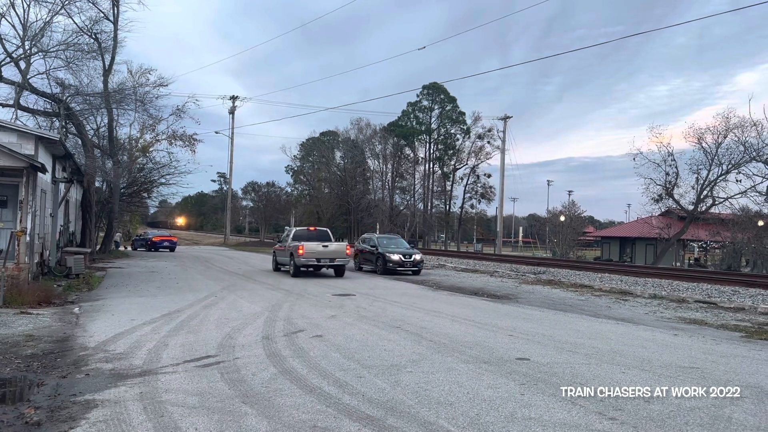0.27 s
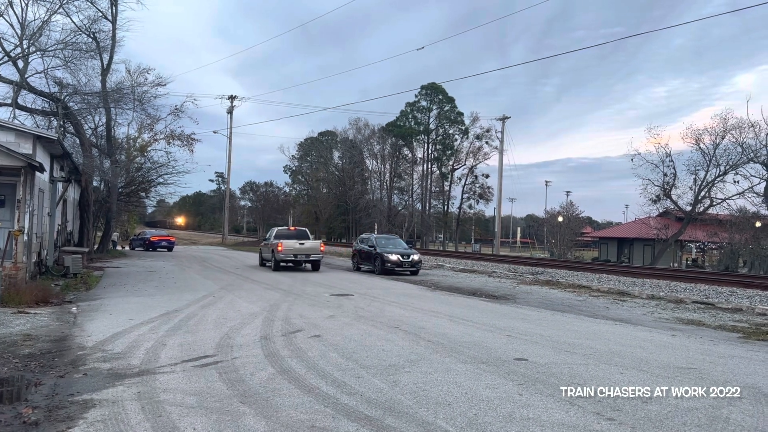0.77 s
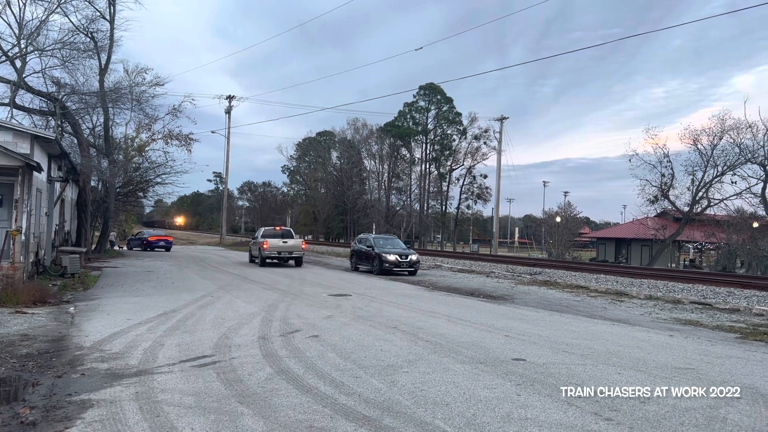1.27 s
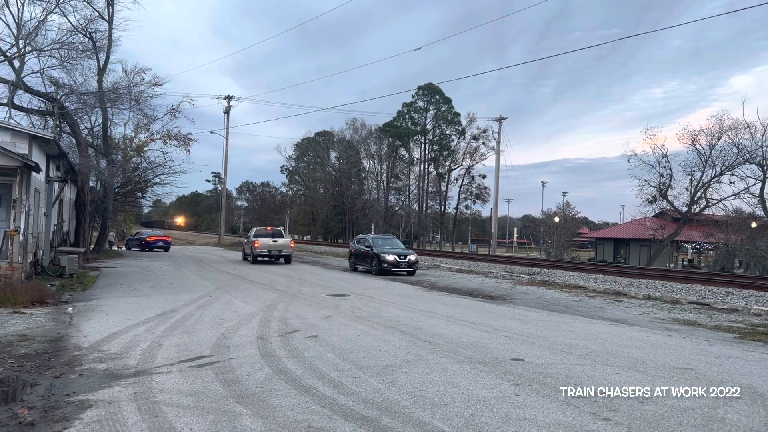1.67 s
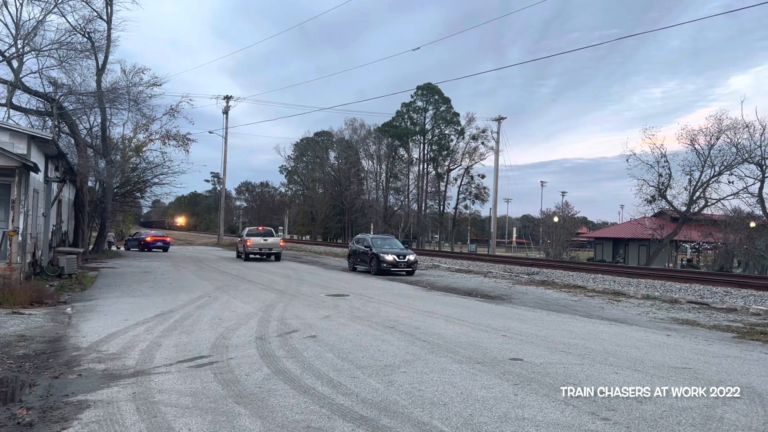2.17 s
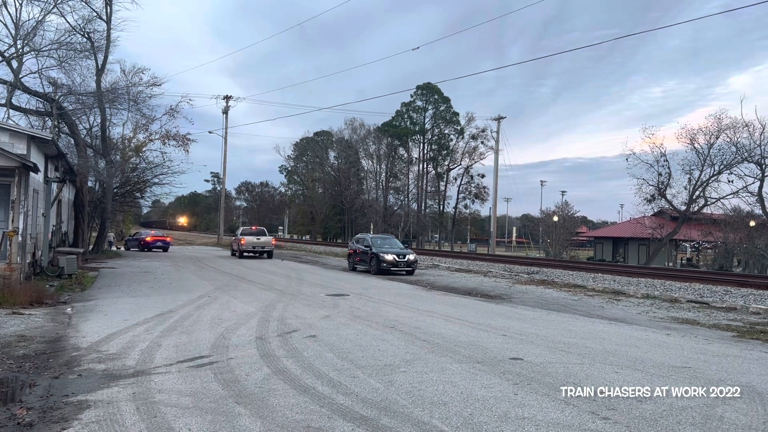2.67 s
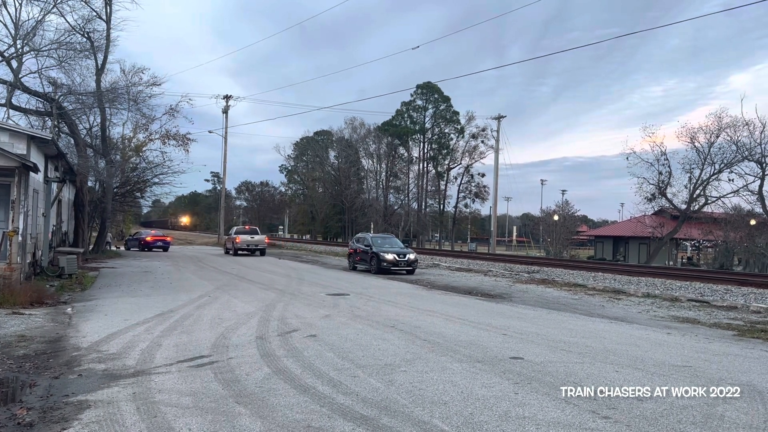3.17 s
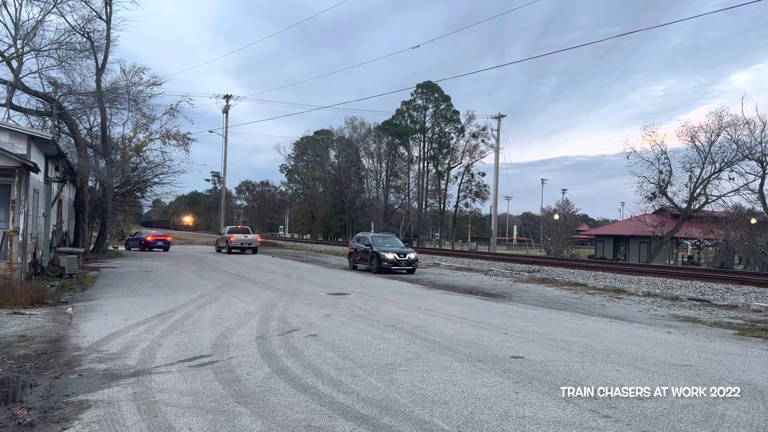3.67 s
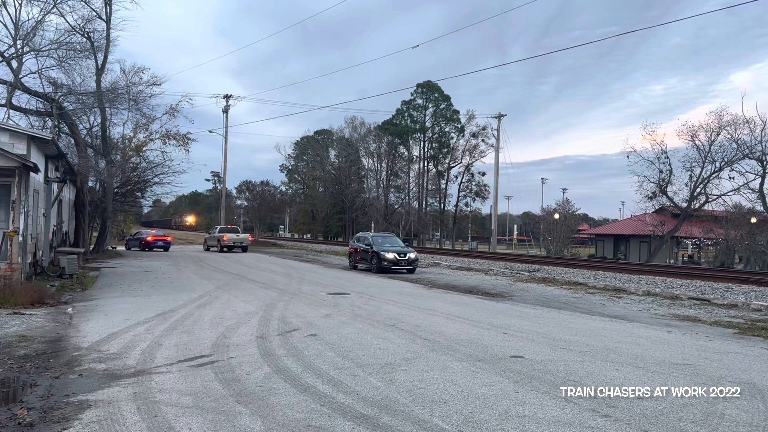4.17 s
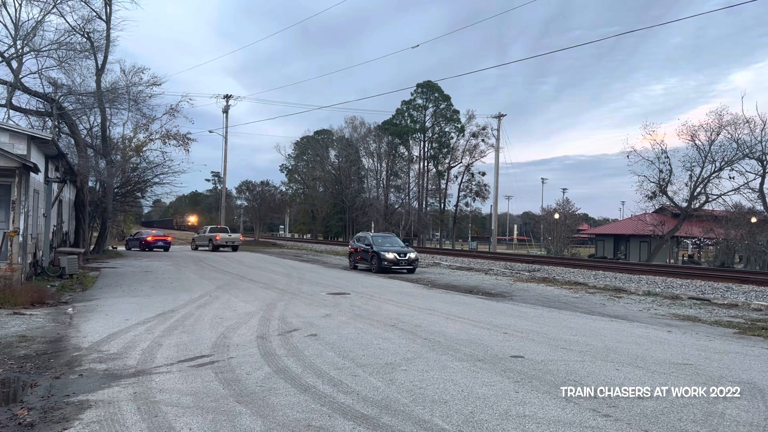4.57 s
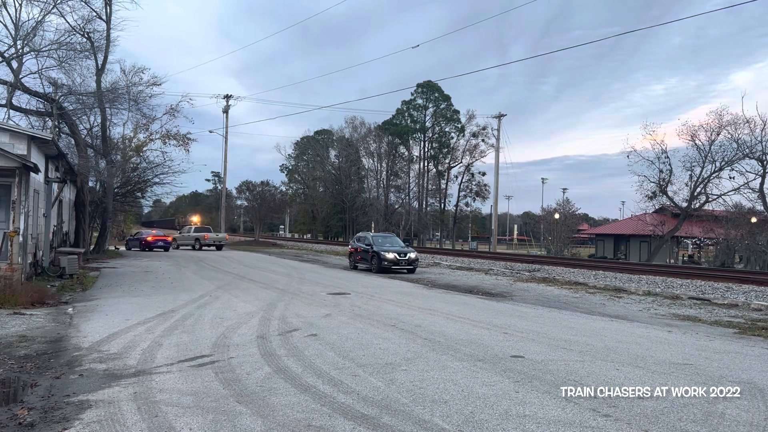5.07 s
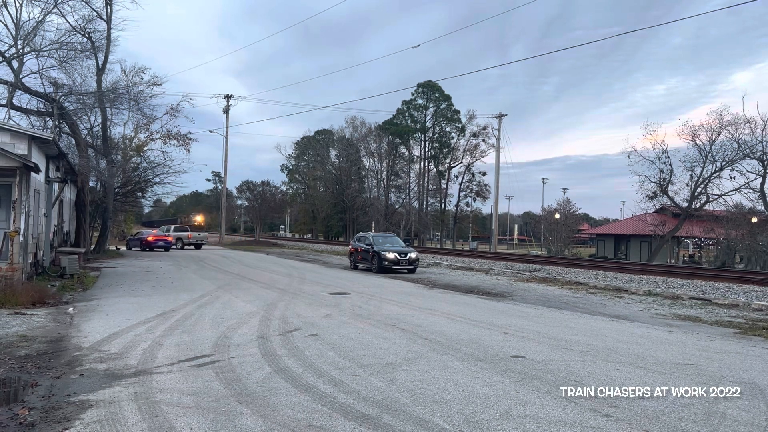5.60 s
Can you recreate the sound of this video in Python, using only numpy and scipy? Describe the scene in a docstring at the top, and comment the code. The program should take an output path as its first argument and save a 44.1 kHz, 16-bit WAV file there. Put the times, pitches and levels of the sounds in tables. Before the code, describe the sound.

Outdoors beside a road near a railway, a pickup rolls away with tyre rush and gravel crackle. Almost at once a train horn blows a sustained five-note chord for about two seconds, then sags off into lower-pitched echoes from trees and walls. A throbbing diesel rumble steadily swells beneath, while an oncoming car's tyre hiss rises near the end. Stereo microphones stand at the roadside, the train some way off.

```python
"""At a road crossing near woods and walls, a freight train nears and blows one long five-bell horn chord.
The horn is summed from harmonics that follow its air; walls and woods return it at Doppler-lowered pitch.
Exhaust orders in throbbing noise make the diesel, whose rumble grows as the distance shrinks.
Coloured noise makes the cars that roll slowly over the gritty road; brief noise bursts make stones and knocks.
A microphone pair, differing in phase and level, hears it all."""
import sys
import numpy as np
from scipy import signal
from scipy.fft import rfft, irfft, next_fast_len
from scipy.io import wavfile

SR = 44100
rng = np.random.default_rng(int(sys.argv[2]) if len(sys.argv) > 2 else 0)


def pcm_store(signal):
    """Save signal as 16-bit PCM."""
    levels = np.round(np.clip(np.atleast_2d(signal), -1, 1) * 32767)
    wavfile.write(sys.argv[1], SR, levels.astype(np.int16).T)


N = 257544
TIME = np.arange(N) / SR
BINS = np.fft.rfftfreq(N, 1 / SR)
# the horn valve opens, and later begins to ease back
OPEN_S, CLOSE_S = 0.1826, 2.22


def amp(db):
    """Turns dB into an amplitude factor."""
    return 10 ** (np.asarray(db) / 20)


def unit(x):
    """Scales to rms 1."""
    return x / np.sqrt(np.mean(x ** 2) + 1e-20)


def read(points):
    """Reads a table over frequency, on a log axis."""
    hz, value = np.transpose(points)
    return np.interp(np.log(BINS + 1), np.log(hz + 1), value)


def curve(rows):
    """Reads a table over time."""
    return np.interp(TIME, *np.transpose(rows))


def colour(x, points):
    """Filters by a spectrum in dB."""
    return irfft(rfft(x) * amp(read(points)), N)


def drift(hz):
    """Slow chance of rms 1, moving up to about hz times a second."""
    size = 1024
    rates_hz = np.arange(size // 2 + 1) * SR / N
    spectrum = rfft(rng.standard_normal(size)) / (1 + (rates_hz / hz) ** 4)
    return np.interp(TIME, np.linspace(0, N / SR, size), unit(irfft(spectrum)))


def diffuse(pair):
    """Two unrelated signals become one diffuse field: alike in the bass, apart in the treble."""
    # likeness of the two microphones: f/Hz, correlation/1
    likeness = [(60, .9993), (110, .998), (180, .988), (300, .96), (520, .76), (900, .4), (1500, .4),
                (2600, .55), (5000, .3), (9000, .7)]
    a, b = rfft(pair)
    same = np.clip(read(likeness), -1, 1)
    right = same * a + np.sqrt(1 - same ** 2) * b
    return irfft(np.array([a, right]), N)


def diesel(rumble_db=-0.5, wander=0.001, flutter=0.58, fading_hz=6, throb_db=1.3, drone_fading=0.15):
    """Exhaust orders, locked to the engine's working cycle, in a throbbing rumble that swells as it nears."""
    # engine speed: t/s, working cycles/Hz
    speed = [(0, 8.68), (1.5, 8.61), (2.8, 8.64), (4.2, 8.68), (5.84, 8.7)]
    # exhaust orders: multiple of the cycle/1, level/dB against engine_db at the starting distance,
    # depth of fading/1, power of nearness by which it grows/1
    exhaust = [(5, -15, 0.4, 1.1), (7, -15, .6, 1.3), (12, -19, 0.3, 2.9), (13, -18, 0.6, 2.1),
               (20, -17, 0.6, 0.51), (24, -20, 0.3, 0.82), (27, -18, 0, 1.6), (29, -18.5, 0.09, 0.51)]
    # the three strongest orders make the drone: multiple of the cycle/1
    drone_orders = (8, 11, 16)
    # one level table for each drone order: t/s, level/dB
    drone_levels = [
        [(0, -33.5), (.8, -37.5), (1.8, -34.5), (3.2, -36.5), (4.3, -39), (4.52, -28.5), (4.73, -27.5),
         (4.92, -33.5), (5.1, -32), (5.84, -36)],
        [(0, -35.5), (2, -34.5), (2.9, -35), (3.7, -31.5), (3.9, -31.5), (4.6, -31.5), (5.1, -31), (5.84, -26)],
        [(0, -34.5), (1.1, -35.5), (1.75, -35.5), (2.25, -35), (2.65, -29), (3.1, -33.5), (4.6, -34.5),
         (5.05, -29.5), (5.84, -29.5)],
    ]
    # low thunder of the exhaust: f/Hz, relative level per Hz/dB
    rumble_colour = [(20, -33), (33, -15.5), (47, -6.5), (65, -2.5), (85, 2), (105, 0.5), (125, -2),
                     (160, -7), (240, -8.5), (320, -13.5), (450, -23), (700, -51), (1500, -79.5)]
    distance_m, train_m_per_s, engine_db = 134, 11.74, -32

    turns = np.cumsum(curve(speed) * (1 + wander * drift(0.97))) / SR
    nearness = distance_m / np.maximum(distance_m - train_m_per_s * TIME, 10)

    def tone(order, fading):
        """One exhaust order, fading and wavering on its way."""
        phase = 2 * np.pi * (order * turns + rng.random())
        wave = np.sin(phase + flutter * drift(0.7))
        return unit((1 + fading * drift(fading_hz)) * wave)

    orders = sum(amp(db) * nearness ** growth * tone(k, fading) for k, db, fading, growth in exhaust)
    noise = diffuse(rng.standard_normal((2, N)))
    rumble = unit(colour(noise, rumble_colour)) * amp(throb_db * drift(42))
    drone = sum(amp(curve(rows)) * tone(k, drone_fading) for k, rows in zip(drone_orders, drone_levels))
    return amp(engine_db) * (orders + amp(rumble_db) * nearness * rumble) + drone


def cars(flicker_db=0.9, leaving_db_per_s=9, arriving_db_per_s=5):
    """Rolling wheels rush as coloured noise: a pickup drives off, and an oncoming car hisses closer."""
    # steady rush of wheels: f/Hz, relative level per Hz/dB
    road = [(100, -5.5), (400, 1.5), (650, 3), (900, -2), (1100, -1.5), (1280, -6.5), (1700, -6),
            (2900, -9), (3500, -16), (3900, -20), (5200, -23.5), (7000, -36), (9000, -45), (10500, -56)]
    # tyres of the close pickup: f/Hz, relative level per Hz/dB
    pickup_tyres = [(100, -5), (400, -3.5), (650, 1.5), (900, 4), (1150, 2.5), (1400, 1), (1800, -9.5),
                    (2900, -15), (4000, -26.5), (7000, -42), (10500, -58)]
    # tyre hiss of the oncoming car: f/Hz, relative level per Hz/dB
    hiss_colour = [(800, -14), (2000, 3), (4000, 2.5), (6000, -3), (8000, -11), (10200, -29)]
    # low exhaust murmur of the pickup: f/Hz, relative level per Hz/dB
    pickup_motor = [(25, -16), (50, -3.5), (100, 2), (170, -2.5), (250, 4.5), (330, 3.5), (500, -22),
                    (1000, -55)]
    # low exhaust murmur of the oncoming car: f/Hz, relative level per Hz/dB
    oncoming_motor = [(25, -13.5), (55, 7.5), (100, 1), (170, 2), (210, 1.5), (330, -14), (500, -31),
                      (1000, -61)]
    rolling_db, pickup_db, pickup_db_per_s = -44.5, -41, 4.5
    hiss_db, hiss_db_per_s, arrives_s = -56, 11.5, 5.84
    # the pickup's murmur at the start, the oncoming car's on arrival
    pickup_motor_db, oncoming_motor_db = -32, -31

    def noise(spectrum):
        """Two unrelated noises of this colour."""
        return unit(colour(rng.standard_normal((2, N)), spectrum))

    to_go_s = abs(arrives_s - TIME)
    rush = amp(rolling_db) * noise(road)
    rush = rush + amp(pickup_db - pickup_db_per_s * TIME) * noise(pickup_tyres)
    hiss = amp(hiss_db - hiss_db_per_s * to_go_s) * noise(hiss_colour)
    pickup = amp(pickup_motor_db - leaving_db_per_s * TIME) * noise(pickup_motor)
    oncoming = amp(oncoming_motor_db - arriving_db_per_s * to_go_s) * noise(oncoming_motor)
    return (rush + hiss) * amp(flicker_db * drift(32)) + pickup + oncoming


def gravel(grains_per_s=1200, spread_db=0.5, grit_db=4, snap_db=2):
    """Sparse grains crackle, most on the loose patches; larger stones snap or scrape as decaying noise."""
    # tyres cross loose grit: start t/s, length/s, level/dB before grit_db and colour
    patches = [(0, 0.41, -63), (2.543, 0.31, -72), (3.74, 0.72, -60), (4.495, 0.57, -64),
               (5.354, 0.62, -82)]
    # stones that snap or scrape: t/s, level/dB before snap_db and colour, t60/s
    stones = [(.084, -53, 0.022), (0.205, -35.5, 0.008), (.24, -33.5, 0.0055), (.255, -37, 0.012),
              (0.329, -45, 0.023), (.367, -45, 0.017), (.62, -52.5, 0.33), (.718, -54.5, .06),
              (1.253, -55, .15), (1.493, -58, .04), (1.82, -50.5, 0.11), (2.054, -44.5, .008),
              (2.06, -56, 0.13), (2.122, -59, .03), (2.562, -56.5, 0.34), (2.719, -58, .02),
              (2.934, -47, 0.035), (3.059, -56, 0.11), (3.616, -45, 0.019), (3.929, -46, 0.021),
              (4.276, -49, .04)]
    # colour of the fine grit: f/Hz, relative level per Hz/dB
    crackle = [(1500, -15.5), (4000, -3.5), (6000, -4), (7200, -11), (8700, -6.5), (10200, -22)]
    # colour of the larger stones: f/Hz, relative level per Hz/dB
    stone_colour = [(1000, -14.5), (2500, -3.5), (4000, 1.5), (6000, -1.5), (7300, -13), (9000, -1),
                    (10200, -22.5)]
    patch_edge_s, bare_road_db = 0.047, -71  # the bare road too is raised by grit_db

    loose = amp(bare_road_db)
    for start, length, db in patches:
        inside_s = np.minimum(TIME - start, start + length - TIME)
        loose = loose + amp(db) * np.clip(inside_s / patch_edge_s, 0, 1)
    sizes = amp(spread_db * np.minimum(rng.exponential(1, (2, N)), 5))
    struck = rng.random((2, N)) < grains_per_s / SR
    grit = unit(sizes * rng.standard_normal((2, N)) * struck) * amp(grit_db) * loose
    snaps = np.zeros(N)
    for start, db, t60 in stones:
        decay_db = -60 * np.clip((TIME - start) / t60, 0, 2)
        snaps += (TIME >= start) * amp(snap_db + db + decay_db)
    return colour(grit, crackle) + colour(snaps * rng.standard_normal((2, N)), stone_colour)


def woods(chord, count=9, restless_s=0.00035, absorb_hz=1300, treble_life=0.31, patchy_db=1.1):
    """Each stand of trees hears the moving horn at its own pitch, and scatters it late through restless air."""
    # stands from ahead of the train to behind it: Doppler drop/%, its spread/%, delay/s, depth/s, t60/s,
    # level/dB before return_colour
    stands = [(.2, .25, .04, .15, 0.91, -39), (.3, .4, .25, .2, 3.6, -45.5), (3.5, 2, .08, 0.2, 1.2, -44.5),
              (6.7, .5, 0.11, .15, 0.79, -44), (6.4, .8, .6, .35, 4.1, -46.5)]
    # colour that the woods give to what they send back: f/Hz, level/dB
    return_colour = [(330, -0.5), (650, 3), (720, -1), (820, 0), (1180, -4), (1280, -0.5), (1420, -3.5),
                     (1680, -4.5), (1745, -4.5), (1810, -8), (1890, -2), (2110, -5.5), (2350, 0.5),
                     (2850, 1), (3400, -1), (4200, -2.5)]
    out, size = np.zeros((2, N)), next_fast_len(N + 2 * SR)
    t = TIME[:2 * SR]
    for drop, spread, delay, depth, t60, db in stands:
        shifts = 1 - (drop + spread * rng.permutation(np.linspace(-1, 1, count))) / 100
        delays = delay + depth * (np.arange(count) + rng.random(count)) / count
        trees = np.zeros(N)
        for shift, late in zip(shifts, delays):
            sent = (TIME - late + restless_s * drift(8.8)) * shift
            trees += np.interp(sent, TIME, chord, left=0)
        # the air soaks up the treble of the longer paths
        scatter = rng.standard_normal((2, len(t)))
        low = signal.filtfilt(*signal.butter(2, absorb_hz, fs=SR), scatter, padtype=None)
        tail = low * amp(-60 * t / t60) + (scatter - low) * amp(-60 * t / (t60 * treble_life))
        scattered = irfft(rfft(trees, size) * rfft(tail, size), size)[:, :N]
        out += amp(db) * unit(scattered) * amp(patchy_db * drift(5.1))
    return colour(out, return_colour)


def valve(turn, weak_db, step_db, vent_db_per_s, steepness=1.59):
    """Air at one bell builds up, holds and vents: blowing strength in dB, and the pitch factor that follows."""
    # the air fills the horn; the valve eases back by one step, then shuts and the air vents
    fill_s, step_s, vent_s = 0.159, 0.084, 2.321
    # sharp until the air is up, off pitch as it vents, sagging as it runs out (shares of the pitch)
    sharp, turn_s, sag_from_s, sag_per_s = 0.014, 0.13, 2.4, 0.09
    lacking = np.exp(-(np.maximum(TIME - OPEN_S, 0) / fill_s) ** steepness)
    closing_s = np.maximum(TIME - CLOSE_S, 0)
    blow_db = weak_db * lacking + step_db * np.minimum(closing_s / step_s, 1)
    blow_db -= vent_db_per_s * np.maximum(TIME - vent_s, 0)
    bend = sharp * lacking + turn * np.minimum(closing_s / turn_s, 1)
    bend -= sag_per_s * np.maximum(TIME - sag_from_s, 0)
    return blow_db, 1 + bend


def rasp(chord, rasp_db=-29, width_hz=130):
    """Turbulent air in the bells roughens every harmonic."""
    turbulence = unit(signal.lfilter(*signal.butter(2, width_hz, fs=SR), rng.standard_normal(N)))
    return chord * (1 + amp(rasp_db) * turbulence)


def horn(waver=0.00095, fade_db=0.41, smear=0.24, jitter=0.00063, brass_db_per_octave=5):
    """Five diaphragms buzz into their bells: the chord along the ground, and the bright chord sent around."""
    # bells, low to high; the smallest speaks first and softly: f/Hz, start t/s, attack/s, stop t/s,
    # share by which the pitch turns as the air vents/1
    bells = [(324.0, .199, .008, 2.495, -.013), (379.4, .201, .008, 2.42, .004),
             (437.0, .199, .018, 2.44, .011), (506.9, .199, .014, 2.425, .003),
             (633.6, .168, .035, 2.485, .021)]
    # voices of the bells, low to high: level/dB of each harmonic from the first
    voices = [(-27.5, -27.5, -34, -48, -55.5), (-27, -39, -47, -54.5, -50.5),
              (-21, -38.5, -46.5, -47, -53.5), (-28.5, -44, -60.5, -60, -57),
              (-25, -45.5, -50.5, -58.5, -61.5, -69, -75, -77)]
    # answer of each bell to the air: weak start/dB, step down/dB, venting/(dB/s),
    # how much faster each further harmonic follows/1, trend of the fundamental/(dB/s)
    blowing = [(-1.5, -2, 46, 2.2, -1.5), (-1.5, -3.5, 43, 0.27, 2), (-4.5, -3, 111.5, 1.2, 0),
               (-3, -7, 48.5, .62, 1), (-6, -8, 42.5, 0.57, 0)]
    # upper harmonics that reach along the ground: f/Hz, level/dB before the tilt between bells
    brass = [(1500, -58), (1900, -56.5), (2050, -57.5), (2200, -49.5), (2280, -56.5), (2600, -55.5),
             (2900, -62.5), (3170, -65.5), (3450, -67.5), (3800, -70), (4100, -73.5), (4450, -76.5),
             (5500, -89)]
    # octaves of the second and third bells, which swell and fade slowly: f/Hz
    swell_pitches = (759, 874)
    # one table for each of these octaves: t/s, level/dB against its voice
    swells = [
        [(.2, 1), (.9, 6.5), (1.35, 2.5), (1.55, -5.5), (1.8, -4), (2.15, -2), (2.35, 4)],
        [(.2, 4), (.6, 2), (.85, 0), (1.15, 4.5), (1.4, 1.5), (1.6, -9.5), (1.85, -3), (2.05, 3.5), (2.25, 7)],
    ]
    # colour of the chord sent around: f/Hz, level/dB
    sent_colour = [(320, 4.5), (380, -1.5), (440, 1.5), (507, 0), (640, 1.5), (770, -2.5), (1000, 2),
                   (1150, -4.5), (1300, -4), (1520, -3.5), (1630, -11), (1750, -7), (1900, 5.5), (2100, -5),
                   (2550, -10), (3200, -20), (4200, -23.5), (6000, -41)]
    # the brassy edge above a pitch blooms last, once the diaphragms swing fully
    bloom_hz, bloom_s, bloom_db_per_octave = 1300, 0.38, -2
    # the horn slides a little from left to right (left minus right)
    pan_db, pan_db_per_s = 1, -0.76

    direct, radiated = np.zeros((2, N))
    on = slice(0, int(2.6 * SR))
    blooming = np.exp(-(np.maximum(TIME[on] - OPEN_S, 0) / bloom_s) ** 2)
    from_middle_s = TIME[on] - (OPEN_S + CLOSE_S) / 2
    for bell, levels, answer in zip(bells, voices, blowing):
        hz, start, attack, stop, turn = bell
        weak, step, vent, brighten, trend = answer
        blow_db, bend = valve(turn, weak, step, vent)
        pitch_hz = hz * bend * (1 + waver * drift(14) + jitter * drift(81))
        phase = (2 * np.pi * np.cumsum(pitch_hz) / SR)[on]
        gate = (np.clip((TIME - start) / attack, 0, 1) * np.clip((stop - TIME) / 0.033, 0, 1))[on]
        for k in range(1, int(5500 / hz) + 1):
            # moving air makes short waves fade and wander the most
            unrest = np.sqrt(k * hz / 400)
            wandering = smear * unrest * drift(3.2)[on]
            wave = np.sqrt(2) * np.sin(k * phase + wandering + 2 * np.pi * rng.random())
            # more air makes the upper harmonics grow faster than the fundamental
            air_db = blow_db[on] * (1 + brighten * min(k - 1, 6))
            bloom_db = bloom_db_per_octave * max(np.log2(k * hz / bloom_hz), 0) * blooming
            partial = gate * amp(air_db + bloom_db) * wave
            # the small bells carry most of the brassy edge
            brass_db = np.interp(k * hz, *np.transpose(brass))
            brass_db += brass_db_per_octave * np.log2(hz / bells[-1][0])
            level_db = levels[k - 1] if k <= len(levels) else brass_db
            swell_db = (k == 1) * trend * from_middle_s
            for swell_hz, rows in zip(swell_pitches, swells):
                if round(k * hz) == swell_hz:
                    swell_db = curve(rows)[on]
            direct[on] += partial * amp(level_db + swell_db + fade_db * unrest * drift(3.7)[on])
            radiated[on] += partial / k ** 0.19
    pan = amp((pan_db + pan_db_per_s * TIME) * np.array([[.5], [-.5]]))
    return rasp(direct) * pan, unit(colour(radiated, sent_colour))


def knocks(width=0.31, order=2):
    """Knocks and clacks from the road: short noise bursts in a broad resonance."""
    # t/s, peak level/dB, centre f/Hz, t60/s of the burst ahead of its resonance
    clacks = [(0.203, -35, 2200, .04), (2.054, -36.5, 3440, 0.024), (3.061, -38, 2300, .05),
              (3.08, -35, 1300, .06), (3.239, -33, 2720, 0.046), (4.023, -32.5, 1600, 0.024),
              (4.032, -36, 1510, 0.022), (4.288, -34.5, 1150, .11), (4.709, -36.5, 1100, .1),
              (4.765, -41, 805, .1)]
    out, t = np.zeros((2, N)), TIME[:SR // 4]
    for start, db, hz, t60 in clacks:
        band = signal.butter(order, [hz * np.exp(-width), hz * np.exp(width)], "band", fs=SR)
        burst = rng.standard_normal((2, len(t))) * amp(-60 * t / t60)
        knock = signal.lfilter(*band, burst)
        out[:, round(start * SR):][:, :len(t)] += amp(db) * knock / abs(knock).max()
    return out


def walls(chord, restless_s=0.00025, fade_db=4, recede_db_per_s=5.0):
    """Walls behind and beside the train return clear echoes, each at its own pitch and fading in the wind."""
    # echo paths: Doppler drop share/1, delay/s, lead of the left ear/s
    paths = [(.069, .24, .0002), (.068, .72, -.0001), (.036, .27, -.0002), (.004, .47, .0001),
             (.066, .45, 0)]
    # level/dB of each path before it fades and recedes
    path_levels = [-34.5, -41.5, -45, -43.5, -39.5]
    # colour of the chord that reaches the walls: f/Hz, level/dB
    wall_colour = [(320, -7.5), (440, -11.5), (507, -1.5), (640, -3.5), (760, 7), (880, -5.5), (1010, -1.5),
                   (1140, 1), (1300, -11.5), (1520, 3), (1700, -14), (1900, -13), (2200, -10), (3000, -5.5),
                   (5000, -15)]
    out, chord = np.zeros((2, N)), colour(chord, wall_colour)
    for (drop, delay, lead), db in zip(paths, path_levels):
        sent = (TIME - delay + restless_s * drift(4.6)) * (1 - drop)
        heard = np.array([np.interp(sent + ear * lead, TIME, chord, left=0) for ear in (.5, -.5)])
        fading_db = fade_db * np.tanh(drift(7.1)) - recede_db_per_s * (TIME - delay)
        out += amp(db + fading_db) * unit(heard)
    return out


def scene(earlier_s=2.6, earlier_db=-9):
    """The horn and engine straight ahead, with echoes and road sounds all around."""
    direct, radiated = horn()
    echoes = woods(radiated)
    # the echo of an earlier blast is still dying away at the start
    later = [np.interp(TIME + earlier_s, TIME, side, right=0) for side in echoes]
    lingering = amp(earlier_db) * np.array(later)
    around = diffuse(echoes + lingering + cars() + gravel() + knocks())
    return direct + walls(radiated) + diesel() + around


def record(dry):
    """Two microphone ports differ in phase and level; then the band limit."""
    # phase between the ports: f/Hz, lead of the left/rad
    lead = [(20, .03), (60, .06), (100, .08), (300, .28), (520, .43), (780, 1.0), (1400, .4), (1980, 1.9),
            (2760, 2.2), (5000, 1.4), (8000, .2)]
    # level between the ports: f/Hz, left minus right/dB
    tilt = [(60, 1), (140, -2), (320, 1), (500, -2), (750, 1), (1100, 4), (1900, 1), (2800, 0), (4500, 5),
            (8000, 0.5)]
    edge_hz = 10300
    half = amp(read(tilt) / 2) * np.exp(.5j * read(lead))
    ports = irfft(rfft(dry) * np.array([half, 1 / half]), N)
    lowpass = signal.firwin(255, edge_hz, window=("kaiser", 9), fs=SR)
    return signal.oaconvolve(ports, lowpass[None], "same")


dry = scene()
out = record(dry)
pcm_store(out)
```